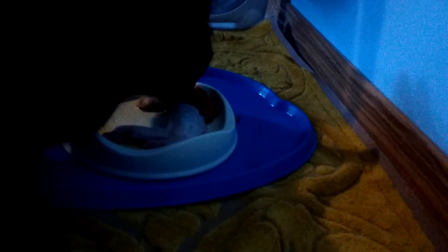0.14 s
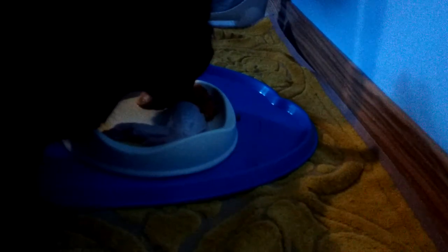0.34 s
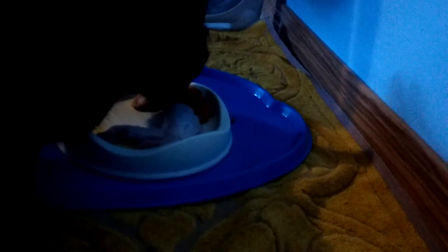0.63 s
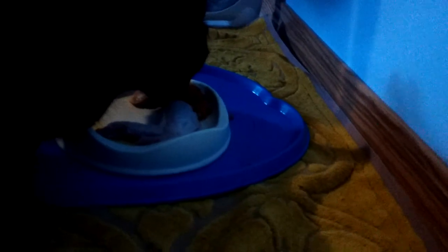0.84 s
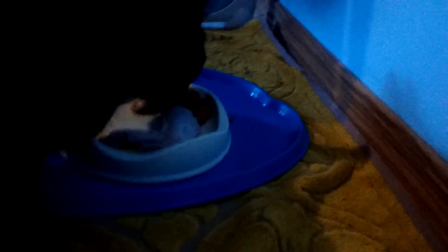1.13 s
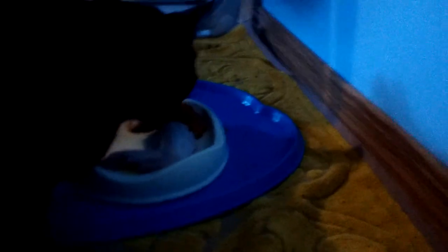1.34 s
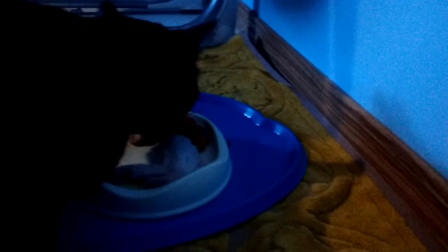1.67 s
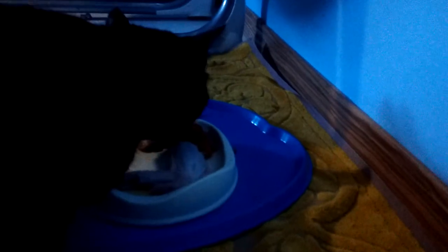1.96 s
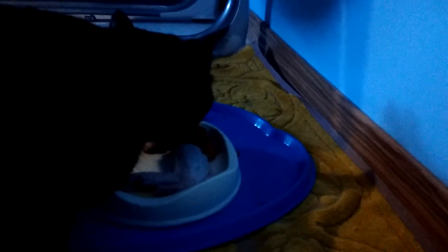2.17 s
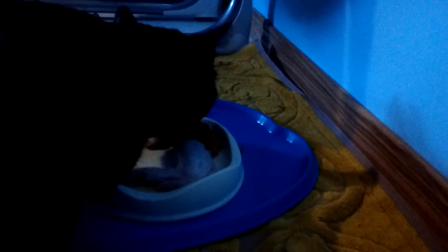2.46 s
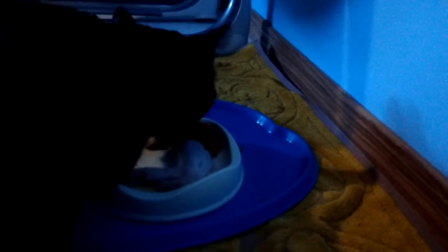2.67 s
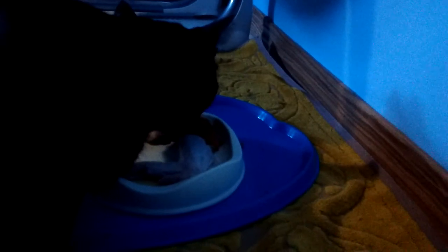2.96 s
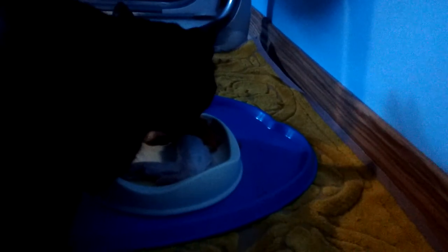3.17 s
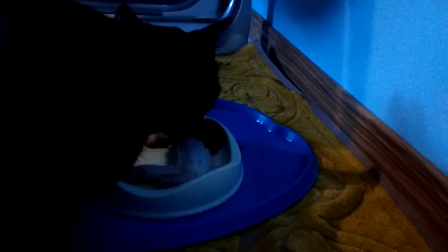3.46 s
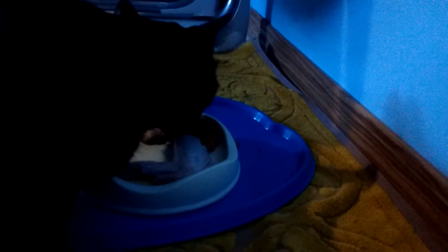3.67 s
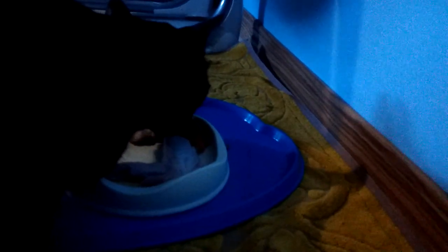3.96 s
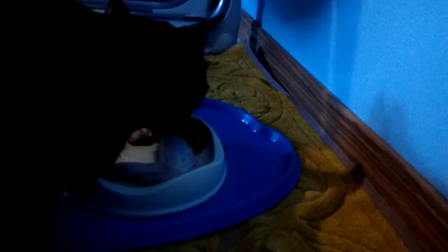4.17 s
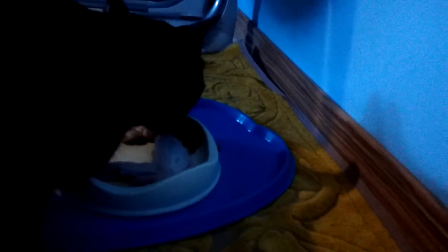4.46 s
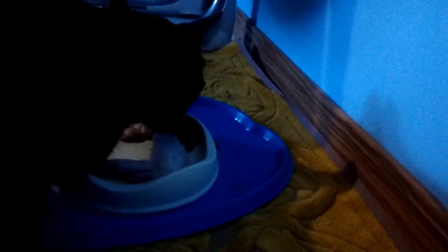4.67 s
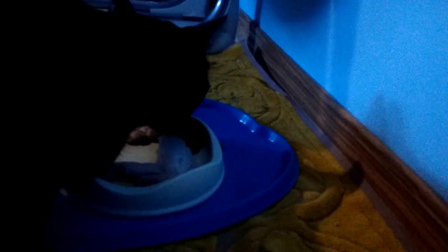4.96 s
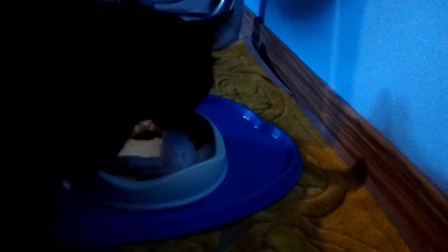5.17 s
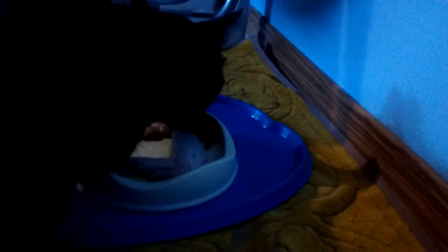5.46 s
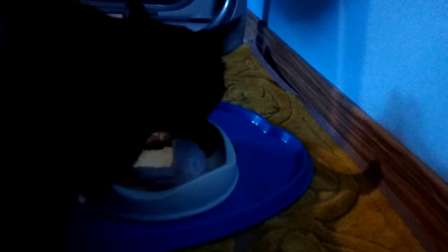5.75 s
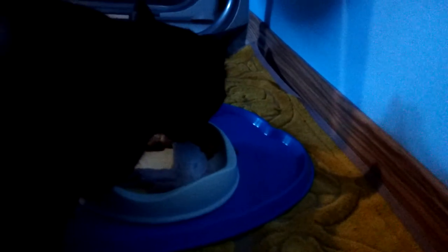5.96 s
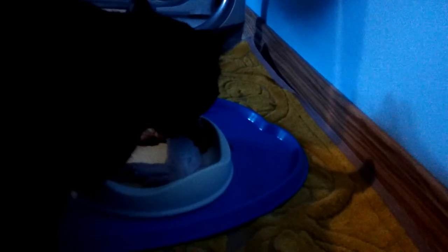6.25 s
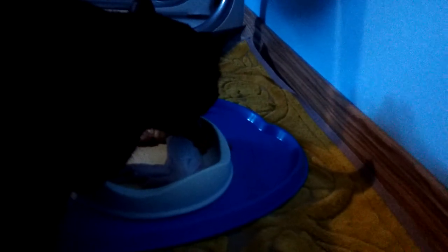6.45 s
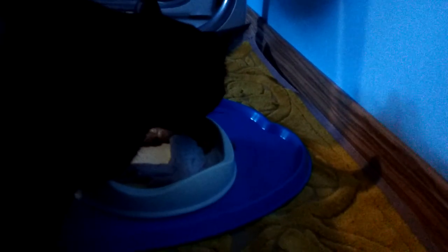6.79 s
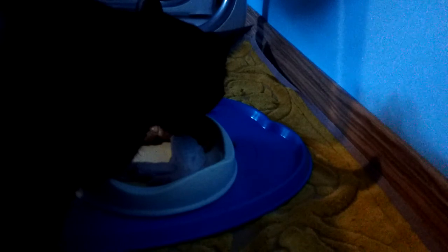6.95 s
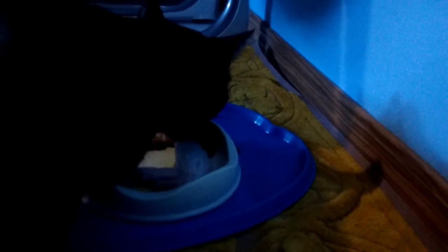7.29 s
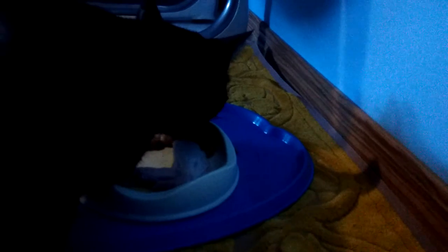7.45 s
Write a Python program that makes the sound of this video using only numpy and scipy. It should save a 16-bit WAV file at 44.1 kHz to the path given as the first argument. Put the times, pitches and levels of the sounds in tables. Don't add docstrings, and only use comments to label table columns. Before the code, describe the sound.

A cat eats wet food from a ceramic bowl up close, with irregular soft pops, lip smacks and tiny wet ticks over low room rumble.

```python
import sys
import numpy as np
from scipy import signal
from scipy.fft import rfft, irfft, next_fast_len
from scipy.io import wavfile
from scipy.ndimage import map_coordinates

SR = 44100
rng = np.random.default_rng(int(sys.argv[2]) if len(sys.argv) > 2 else 0)


def gain_from_decibels(decibels):
    exponent = np.asarray(decibels, float) / 20
    return 10 ** exponent


def to_wav(sig):
    pcm = np.clip(np.atleast_2d(sig), -1, 1) * 32767
    pcm = np.round(pcm).astype(np.int16)
    wavfile.write(sys.argv[1], SR, pcm.T)


N = 336042


def unit(x):
    return x / np.sqrt(np.mean(x ** 2) + 1e-20)


def along(points, hz):
    f, v = np.transpose(points)
    return np.interp(np.log(hz + 1), np.log(f + 1), v)


def wobble(knots_per_s, n):
    knots = rng.standard_normal(int(n * knots_per_s / SR) + 4)
    return map_coordinates(knots, [np.arange(n) * knots_per_s / SR])


def filtered(x, response):
    n = x.shape[-1]
    m = next_fast_len(n + SR // 2)
    spectrum = rfft(x, m) * response(np.fft.rfftfreq(m, 1 / SR))
    return irfft(spectrum, m)[..., :n]


def peak(f, hz, width_hz):
    return 1j * f * width_hz / (hz * hz - f * f + 1j * f * width_hz)


def ringing(modes, damping=1, contrast=1):
    def response(f):
        total = 0
        for k, (hz, db, t60_s) in enumerate(modes):
            decay_per_s = damping * np.log(1000) / t60_s
            gain = gain_from_decibels(contrast * db) * SR / 2 / decay_per_s
            total = total + (-1) ** k * gain * peak(f, hz, decay_per_s / np.pi)
        return total
    return response


def add(track, s, sound):
    part = track[round(s * SR):][:len(sound)]
    part += sound[:len(part)]


# frequency in Hz, phase in half turns.
PORT_PHASE = [(0, 1), (400, 1.1), (1100, 1.65), (2000, 2.3), (3000, 2.93), (3400, 3.05), (4400, 3.85),
              (5200, 4.15), (6150, 4.95), (6750, 5.05), (8000, 6), (9300, 6.9), (12000, 8), (13700, 8.94),
              (14300, 9.05), (15400, 10), (23000, 10.2)]


def ports(x, side):
    def right(hz):
        half_turns = np.interp(hz, *np.transpose(PORT_PHASE)) - 1
        return -np.exp(1j * np.pi * side * half_turns)
    return np.array([x, filtered(x, right)])


# start in seconds, cheek, lip and saliva levels in dB.
POPS = [(.0264, -37, -60, -43), (0.1931, -38, -32, -43), (.6026, -24.5, -53, -28),
        (0.6985, -17.5, -26, -52), (.81, -27.5, -42, -43), (1.0084, -27.5, -57, -48),
        (1.105, -37, -41, -39), (1.3424, -33, -54, -36), (1.3968, -37, -49, -37.5), (1.408, -38, -45, -37),
        (1.6315, -30, -60, -54), (2.0556, -28, -55, -33), (2.4782, -21, -44, -36), (2.4837, -31, -50, -52),
        (3.1498, -29, -34.5, -55), (3.6443, -30, -55, -45), (3.7369, -17, -32, -51),
        (3.9787, -16.5, -27, -56), (3.9839, -22, -37, -47), (4.2454, -24.5, -50, -40),
        (5.2167, -35, -50, -37.5), (5.2338, -20.5, -39, -53), (5.4821, -16, -15, -32),
        (5.778, -28, -53, -54), (5.7832, -27, -56, -46), (6.0702, -29.5, -53, -40.5),
        (6.371, -28, -34.5, -49), (6.7963, -30.5, -47, -54), (7.241, -28, -52, -28.5),
        (7.3541, -27.5, -53, -45)]
# start in seconds, lip level in dB, saliva level in dB.
SMACKS = [(.2501, -31, -35.5), (0.5366, -30, -32.5), (0.608, -48, -26.5), (0.8045, -25, -33),
          (1.4293, -45, -42), (1.7061, -24, -41), (2.2284, -37, -43), (2.291, -42, -35), (2.957, -38, -40),
          (3.0556, -33, -58), (3.3417, -36, -62), (3.9891, -42, -49), (4.181, -43, -39.5),
          (4.2822, -24, -54), (4.2878, -28, -38), (4.3127, -38, -51), (4.6868, -38, -59),
          (4.7954, -34.5, -48), (5.0373, -25, -44), (5.044, -39, -44), (5.242, -38, -50),
          (5.3037, -30.5, -35), (5.5928, -50, -37), (6.14, -37, -57), (6.377, -36, -47),
          (6.4683, -34.5, -54), (7.1617, -35, -32.5), (7.1717, -53, -41), (7.2969, -36, -55),
          (7.4365, -32.5, -39)]
# start in seconds, saliva level in dB, saliva ring in Hz, lip level in dB.
TICKS = [(.4954, -45, 7500, -42), (.5063, -40, 6900, -37), (.5517, -47, 6900, -49), (1.101, -42, 7160, -32),
         (1.1268, -37, 7440, -34), (1.1375, -38.5, 7640, -40), (1.217, -35, 10600, -33),
         (1.4156, -39, 6660, -33), (2.057, -29, 6500, -48), (1.7321, -37.5, 8800, -45),
         (2.5921, -39.5, 9000, -36), (2.74, -45, 8700, -50), (2.9167, -37.5, 8800, -35),
         (3.195, -39.5, 8900, -34.5), (3.4517, -30.5, 9400, -31.5), (3.4561, -38, 8400, -50),
         (3.5454, -45, 6300, -44), (3.811, -36.5, 11200, -53), (3.8652, -40, 11400, -42),
         (4.0513, -32, 8000, -23.5), (4.059, -41, 8600, -37), (4.554, -42, 9300, -55),
         (5.102, -41, 10200, -50), (6.576, -39.5, 9400, -29.5), (6.6867, -44.5, 7850, -39),
         (6.883, -36, 9000, -42), (6.9844, -47, 9300, -35.5), (7.3179, -43, 14100, -48),
         (7.421, -40, 9400, -36), (7.5868, -37, 9200, -51)]
# start in seconds, saliva ring in Hz.
SPECKS = [(.4894, 7600), (.7155, 5000), (.846, 4800), (1.043, 7500), (1.1185, 3800), (1.156, 7500),
          (1.6706, 8600), (1.6777, 7200), (2.308, 4000), (2.53, 4000), (2.6031, 11400), (2.7343, 8300),
          (2.907, 3800), (2.9773, 5930), (3.5634, 11400), (3.5819, 3800), (3.897, 8000), (3.9585, 12100),
          (5.783, 7700), (6.2085, 9000), (6.4306, 6200), (6.595, 4500), (6.8775, 9500), (7.3333, 8600),
          (7.452, 4000)]


def clicks():
    film_hz, spread_ms, tick_spread_ms = 4250, 2.48, 1.64
    smack_cheek_db, tick_cheek_db, speck_db = -14, -12.5, -43
    partings = [(*row, film_hz, spread_ms) for row in POPS]
    partings += [(s, lip + smack_cheek_db, lip, wet, film_hz, spread_ms) for s, lip, wet in SMACKS]
    partings += [(s, lip + tick_cheek_db, lip, wet, hz, tick_spread_ms) for s, wet, hz, lip in TICKS]
    partings += [(s, speck_db - 25, speck_db - 8, speck_db, hz, tick_spread_ms) for s, hz in SPECKS]
    out, t = np.zeros(N), np.arange(1536) / SR
    f = np.fft.rfftfreq(len(t), 1 / SR)
    for s, cheek_db, lip_db, wet_db, wet_hz, crackle_ms in partings:
        crackle = 0.2 * rng.standard_normal(len(t)) * np.exp(-t * 1000 / crackle_ms)
        crackle[0] += .7
        shift = np.exp(0.0088 * rng.standard_normal(2))
        jaw = gain_from_decibels(cheek_db + 25.5) * peak(f, 162, 380) ** 2
        cheek = gain_from_decibels(cheek_db + 12.5) * peak(f, 1200 * shift[0], 1800) ** 3
        lips = gain_from_decibels(lip_db + 13.0) * peak(f, 2400 * shift[1], 3100) ** 3
        film_ring = peak(f, wet_hz, 0.6 * wet_hz) ** 3 + 0.25 * peak(f, 6500, 9000) ** 2
        film = gain_from_decibels(wet_db + 15.5) * film_ring
        add(out, s, irfft(rfft(crackle) * (jaw - cheek + lips - film), len(t)))
    return out


# time in seconds, level in dB.
CHEWING = [
    (0.0, -61),
    (2.37, -51),
    (2.8, -60.5),
    (4.05, -53.5),
    (4.71, -70),
    (5.71, -59.5),
    (7.62, -54.5),
]


def chewing():
    s, db = np.transpose(CHEWING)
    sparse = rng.standard_normal(N) * (rng.random(N) < .03)
    grains = sparse * gain_from_decibels(3 * wobble(14, N))
    wet = filtered(grains, lambda f: peak(f, 2300, 1800) ** 2 + .3 * peak(f, 7500, 3000) ** 2)
    return unit(wet) * gain_from_decibels(np.interp(np.arange(N) / SR, s, db) - 8)


# frequency in Hz, level in dB, t60 in seconds.
BOWL_MODES = [(1023, -18, .17), (1825, -26, .3), (2153, -14, .33), (2211, -18, .2), (3456, -10, .15),
              (3513, -9, .2), (3575, -3, .26), (4683, -24, .17), (5093, -18, .2), (5292, -11, .2),
              (5336, -3, .27), (5399, -14, .2), (7383, -19, .2), (7430, -21, .25), (8032, -18, .15),
              (8900, -23, .1), (9500, -22, .1), (10800, -28, .1)]
# start in seconds, level in dB.
KNOCKS = [
    (5.4045, -34),
    (5.4105, -18),
    (5.4275, -29.5),
    (5.4385, -30),
    (.745, -43),
    (.762, -44),
]
# start, attack, hold and release t60 in seconds, contact force in dB.
DRAGS = [
    (0.713, .04, 0.015, 0.3, -30),
    (5.403, 0.0044, 0.022, 0.36, -26),
]


def bowl():
    force, knocks, t = np.zeros(N), np.zeros(N), np.arange(SR // 4) / SR
    for s, attack_s, hold_s, t60_s, db in DRAGS:
        release_db = 60 * np.maximum(t - attack_s - hold_s, 0) / t60_s
        push = np.minimum(t / attack_s, 1) * gain_from_decibels(db - release_db)
        chatter = gain_from_decibels(2.2 * wobble(272, len(t))) * rng.standard_normal(len(t))
        add(force, s, push * chatter)
    for s, db in KNOCKS:
        add(knocks, s, gain_from_decibels([db]))
    damped = ringing(BOWL_MODES, damping=6, contrast=.3)

    def contact(f):
        drag = gain_from_decibels(-33) * damped(f) + gain_from_decibels(-2) * peak(f, 2350, 2600) ** 2
        grit = gain_from_decibels(-2) * peak(f, 6300, 2400) ** 2 + gain_from_decibels(-27.5) * peak(f, 8200, 6000) ** 2
        return drag + grit
    return filtered(knocks, ringing(BOWL_MODES)) + filtered(force, contact)


# frequency in Hz, level in dB, t60 in seconds.
TAG_MODES = [(3400, -7, .04), (5303, -3, .25), (7095, -5, .17), (8021, -4, .22), (8053, -7, .4),
             (8926, -10, .12), (9028, -8, .12), (10700, -8, .06)]
# start in seconds, level in dB.
TAG_HIT = (1.8955, -32)


def tag():
    s, db = TAG_HIT
    blow, tap, rustle, t = np.zeros(N), np.zeros(N), np.zeros(N), np.arange(SR // 2) / SR
    add(blow, s, gain_from_decibels(db - 60 * t / 0.0087) * rng.standard_normal(len(t)))
    add(tap, s, gain_from_decibels([db]))
    add(rustle, s, gain_from_decibels(db - 8.5 - 60 * t / 1.26) * rng.standard_normal(len(t)))
    crack = filtered(gain_from_decibels(8.5) * blow, lambda f: peak(f, 5200, 9000))
    collar = filtered(rustle, lambda f: peak(f, 3100, 2000) ** 2 + 0.88 * peak(f, 8400, 2500) ** 2)
    return gain_from_decibels(-7.5) * filtered(tap, ringing(TAG_MODES)) + crack + collar


# start and length in
# seconds, first and last Hz, peak in dB.
WHISTLES = [(1.97, .23, 5300, 5480, -54), (2.2, 0.038, 5500, 6230, -52),
            (2.237, 0.11, 5740, 5400, -56.5), (2.33, 0.084, 5750, 5580, -61),
            (2.438, 0.045, 5750, 5630, -62), (2.494, 0.035, 7750, 8250, -51),
            (2.521, .03, 8300, 7700, -57), (2.546, 0.1, 5550, 5060, -60),
            (3.59, 0.03, 6350, 6600, -55), (3.61, 0.054, 5550, 5930, -61),
            (3.67, 0.071, 5700, 5420, -63), (3.625, 0.043, 8100, 8000, -55),
            (3.753, 0.037, 1720, 1590, -54), (3.85, .06, 5980, 6640, -52),
            (3.91, 0.05, 8000, 7260, -52), (4.006, 0.026, 1520, 1620, -47),
            (4.02, 0.013, 5920, 5650, -56),
            (5.62, .05, 8000, 8100, -58), (5.219, 0.022, 5600, 5480, -55),
                 (5.24, 0.065, 4850, 4770, -66), (5.3, 0.12, 4820, 5800, -59.5),
                 (5.567, 0.13, 6360, 6900, -51), (5.674, 0.027, 7700, 7640, -53),
                 (5.679, .1, 5400, 5340, -64), (7.332, .025, 6120, 6020, -51.5),
                 (7.392, 0.14, 6000, 6550, -53), (7.486, .03, 7700, 8050, -53),
                 (7.51, .055, 8150, 7900, -46.5), (7.495, 0.027, 5550, 5800, -53),
                 (7.551, 0.072, 5600, 5530, -54.5)]


def nose():
    swell_db, fade_s = 6, .004
    out = np.zeros(N)
    for s, length_s, first_hz, last_hz, db in WHISTLES:
        t = np.arange(round(length_s * SR)) / SR
        u = t / length_s

        def shake(knots_per_s):
            return map_coordinates(rng.standard_normal(400), [t * knots_per_s])
        glide_hz = first_hz + (last_hz - first_hz) * u
        hz = glide_hz * (1 + .008 * shake(30) + 0.006 * shake(195))
        phase = 2 * np.pi * np.cumsum(hz) / SR
        fade = np.minimum(1, np.minimum(t, length_s - t) / fade_s)
        level = gain_from_decibels(db - swell_db * (2 * u - 1) ** 2 + 3.5 * shake(70)) * fade
        halo = gain_from_decibels(-68) * fade * shake(900) * np.cos(phase)
        tone = np.sin(phase) + gain_from_decibels(-28) * np.sin(2 * phase)
        add(out, s, level * tone + halo)
    return out


# frequency in Hz, t60 in seconds.
ROOM_T60 = [(200, 0.47), (2000, 0.14), (10000, 0.055)]


def room(x):
    hz, t, z = signal.stft(rng.standard_normal(SR // 3), SR, nperseg=256)
    decay = gain_from_decibels(-60 * t / along(ROOM_T60, hz)[:, None])
    tail = signal.istft(z * decay, SR, nperseg=256)[1]
    delayed = np.pad(x, (130, 0))
    return ports(signal.fftconvolve(delayed, tail / np.linalg.norm(tail))[:N], 0.81)


# frequency in Hz, level in dB.
HUM_LINES = [(118, -46.5), (262, -58), (525, -65), (857, -59.5), (990, -68.5)]


def hum():
    out, t = np.zeros(N), np.arange(N) / SR
    for hz, db in HUM_LINES:
        level = gain_from_decibels(db + 1.2 * wobble(9, N))
        out += level * np.sin(2 * np.pi * hz * t + .9 * wobble(12, N))
    return out


# frequency in Hz, density in dB per Hz.
FLOOR_SPECTRUM = [(20, -13), (45, -3.5), (90, 0), (130, -1.5), (220, -7), (400, -15.5), (650, -22.5),
                  (1100, -27.0), (2200, -32.5), (3500, -35), (6200, -41), (9000, -40.5), (12500, -44.5),
                  (15300, -44)]
# frequency in Hz, shared part of the power from 0 to 1.
FLOOR_SHARED = [(30, .996), (300, .99), (1500, .95), (3200, .985), (6400, .99), (8000, .75), (11000, .5),
                (14000, .95), (15500, .95)]


def floor():
    def shaped(hz):
        alike = np.clip(along(FLOOR_SHARED, hz), 0, 1)
        return gain_from_decibels(along(FLOOR_SPECTRUM, hz)) * np.sqrt([alike, alike, 1 - alike, 1 - alike])
    noise = filtered(rng.standard_normal((4, N)), shaped)
    slant = np.pi / 4 - .15
    shared = np.cos(slant) * ports(noise[0], -1.085) + np.sin(slant) * ports(noise[1], 0.92)
    drift_db = .5 * wobble(4, N) + .7 * wobble(11, N)
    return unit(shared + noise[2:]) * gain_from_decibels(-39.5 + drift_db)


def scene():
    near = clicks() + chewing() + bowl() + tag()
    whistle = nose()
    direct = ports(near, -0.997) + ports(whistle, -0.916)
    return direct + gain_from_decibels(-10) * room(near + whistle) + ports(hum(), 1.34) + floor()


def roll_off(x):
    return signal.sosfilt(signal.butter(12, 15830, fs=SR, output="sos"), x)


# frequency in Hz, left minus right in dB.
PORT_LEAN = [(30, 0.57), (500, 0.34), (3000, 4), (6500, 3.5), (9000, -5), (12000, 4), (16000, 1.5)]


def record(dry):
    top_hz = 15800

    def colour(hz):
        lean_db = along(PORT_LEAN, hz) * np.array([[.5], [-.5]])
        return gain_from_decibels(lean_db) * (hz < top_hz)
    finished = filtered(dry, colour)
    return roll_off(finished)


dry = scene()
out = record(dry)
to_wav(out)
```